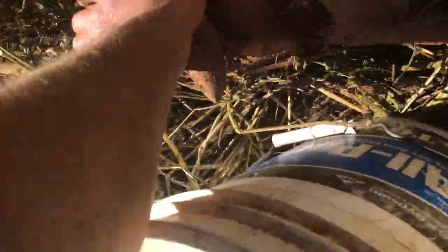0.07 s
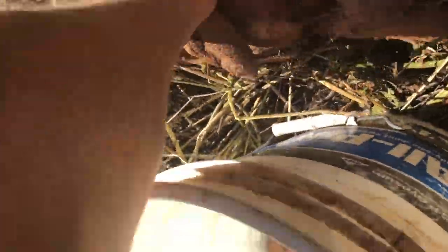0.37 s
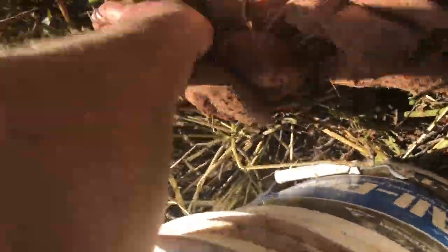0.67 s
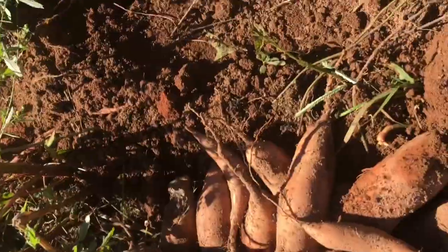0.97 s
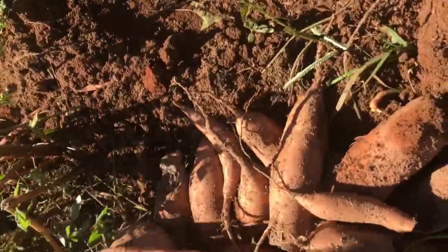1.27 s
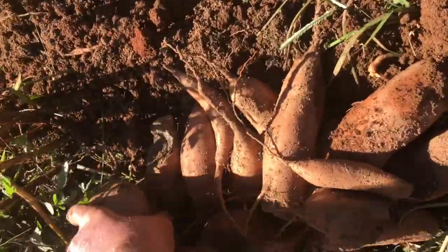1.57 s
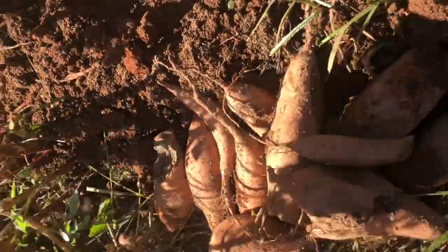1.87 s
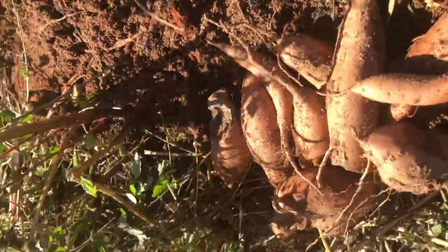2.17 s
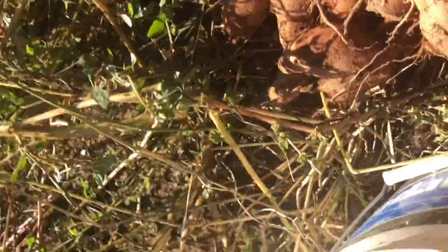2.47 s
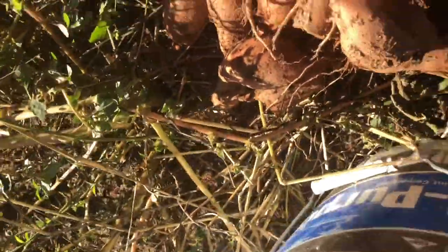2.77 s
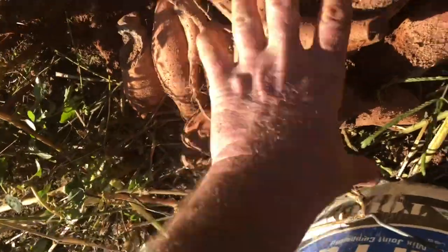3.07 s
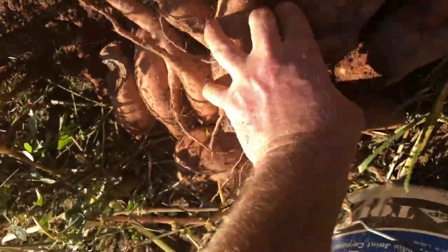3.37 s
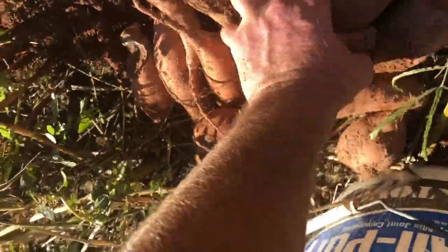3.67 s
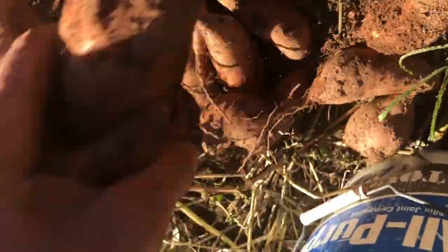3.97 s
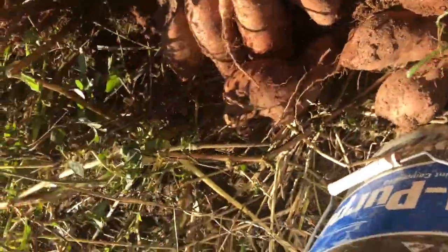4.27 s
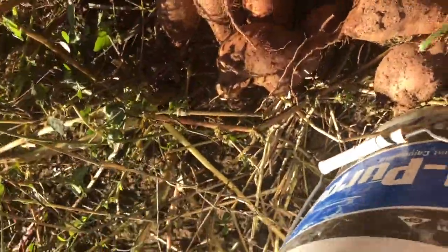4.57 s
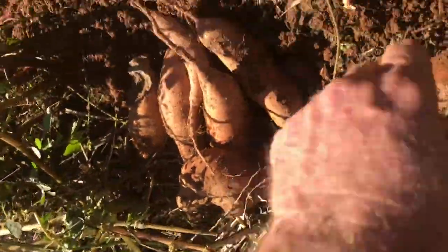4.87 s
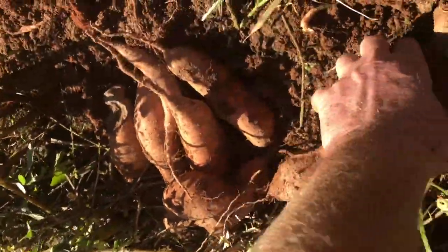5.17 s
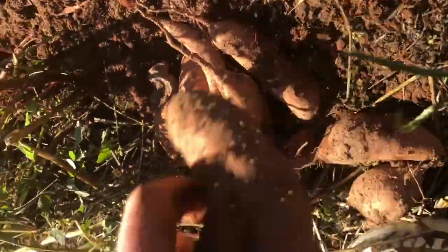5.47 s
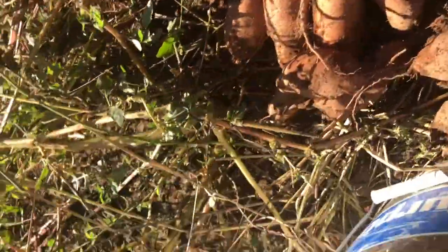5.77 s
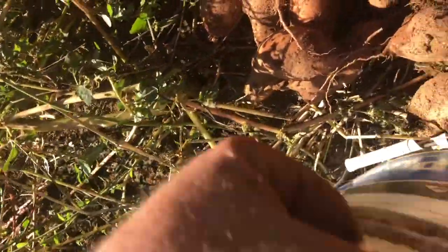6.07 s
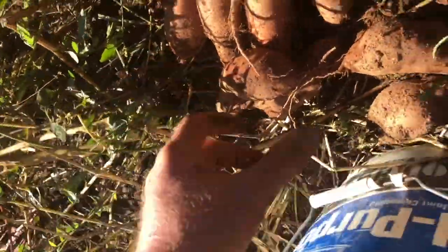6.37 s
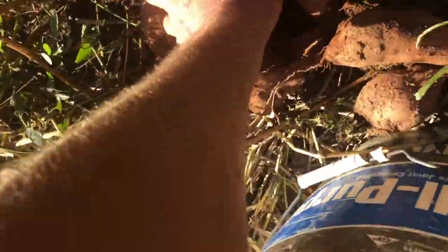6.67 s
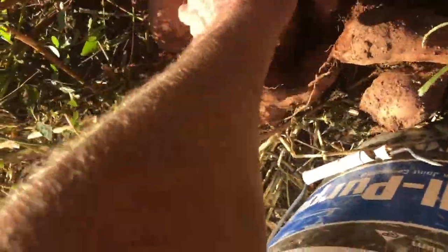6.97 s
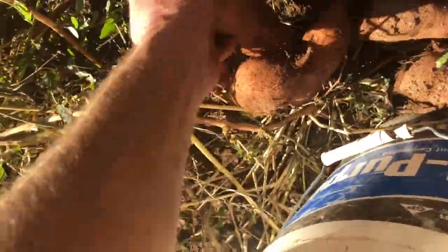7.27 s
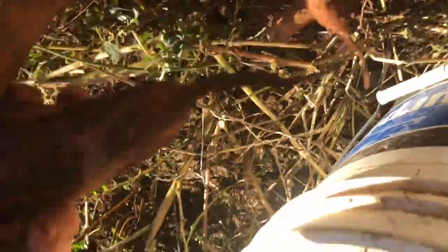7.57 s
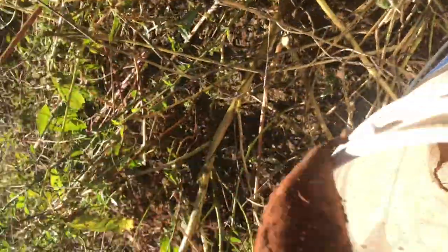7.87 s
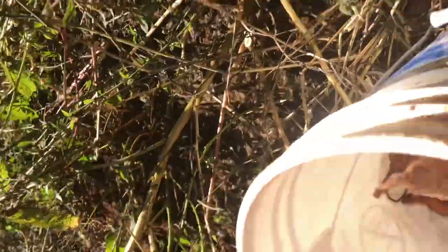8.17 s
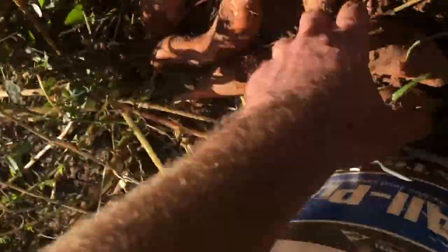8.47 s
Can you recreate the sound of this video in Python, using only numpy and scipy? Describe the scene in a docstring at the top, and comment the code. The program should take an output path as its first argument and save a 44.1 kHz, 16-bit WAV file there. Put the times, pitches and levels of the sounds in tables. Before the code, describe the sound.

Sweet potatoes drop into a plastic bucket in several separate bursts, each a hollow thump with bouncing, knocking and gritty scraping. Before and between the drops, fingers softly crumble earth and crackle dry grass. Past the middle, the plastic snaps sharply and its wire handle rings lightly; the heaviest thud comes near the end. The microphone is close, with only a faint open-air hiss and distant rumble behind.

```python
"""Sweet potatoes go into a plastic bucket in dry grass, close up, over a faint outdoor rumble and hiss.
First, hands work the crumbly soil while grit and stalks tick. Near 2.7 s a tuber booms on the bucket's
bottom, then tumbles and scrapes along the thin wall. A busier tumble follows at 4.3 s, flesh knocking
on flesh. At 6 s the plastic clicks sharply and the wire handle jingles. After more digging, the last
tubers land around 8 s. A limiter holds the loudest blows."""
import sys
import numpy as np
from scipy import signal
from scipy.fft import rfft, irfft, next_fast_len
from scipy.io import wavfile
from scipy.ndimage import uniform_filter1d, minimum_filter1d, map_coordinates

SR = 44100
rng = np.random.default_rng(int(sys.argv[2]) if len(sys.argv) > 2 else 0)


def persist_wave(psi):
    """Save psi, clipped to +-1, as 16-bit WAV."""
    counts = np.round(np.clip(psi, -1, 1) * 32767).astype(np.int16)
    wavfile.write(sys.argv[1], SR, np.atleast_2d(counts).T)


N = 380141

# soft blows on the loaded bottom: start_s, level_db, pitch_hz
BOTTOM_BLOWS = [(2.481, -24, 220), (2.62, -22.5, 147), (2.71, -2.5, 252), (2.732, -14, 215),
                (2.763, -21.5, 151), (2.826, -14, 210), (3.104, -9, 245), (4.303, -5, 243),
                (4.335, -16, 200), (4.47, -7, 263), (4.487, -5, 235), (4.517, -4.5, 261), (4.548, -2, 175),
                (4.589, -4.5, 247), (4.629, -9.5, 227), (5.955, -8.5, 256), (6.008, -13, 234),
                (6.381, -20, 240), (6.608, -5.5, 244), (6.654, -18, 222), (7.859, -6, 226),
                (7.869, -3.5, 218), (8.201, 1, 260), (8.213, -1.5, 211), (8.233, -4, 201), (8.28, -9, 240),
                (8.342, -9.5, 261), (8.478, -27.5, 230)]
# ring of the loaded bottom and the air above it: pitch_hz, level_db, t60_s
BOTTOM_MODES = [(140, -4.5, 0.086), (170, -4, 0.092), (212.6, -5.5, 0.17), (240, -4.5, 0.19),
                (288.4, -3.5, 0.062)]
# tubers tumbling on the wall: start_s, level_db, rise_s, hold_s, grit_offset_db, boom_offset_db
WALL_SKIDS = [(2.355, -34, 0.003, 0.012, -6, -17), (2.472, -31.5, 0.005, 0.035, -15, 0),
              (2.56, -39, 0.01, 0.1, -5, 3), (2.711, -32, 0.002, 0.02, -14, 0),
              (2.755, -27, 0.006, 0.014, -16, 2), (2.86, -35, 0.004, 0.012, -12, 3),
              (2.914, -32, 0.005, 0.025, -25, 3), (2.963, -29.5, 0.003, 0.012, -24, -5),
              (3.098, -36, 0.002, 0.008, -26, 6), (3.16, -43, 0.005, 0.03, -16, 4),
              (3.235, -41, 0.003, 0.005, -20, 8), (3.283, -41, 0.003, 0.005, -20, 2),
              (3.487, -32.5, 0.003, 0.026, -24, -17), (4.081, -40, 0.002, 0.003, -20, -9),
              (4.245, -35, 0.002, 0.03, -22, -8), (4.299, -21.5, 0.006, 0.012, -24, -1),
              (4.405, -21, 0.034, 0.03, -13, -5), (4.473, -16, 0.004, 0.05, -14, -2),
              (4.547, -15, 0.002, 0.02, -13, -2), (4.58, -19, 0.004, 0.05, -22, -4),
              (4.66, -29, 0.004, 0.02, -18, 0), (4.941, -40, 0.003, 0.015, -18, 4),
              (4.965, -32, 0.003, 0.025, -23, 3), (5.822, -45, 0.002, 0.003, -18, -12),
              (5.944, -13, 0.004, 0.028, -13.5, -7), (5.997, -15, 0.003, 0.024, -15, -7),
              (6.07, -25, 0.004, 0.014, -12, -2), (6.14, -36, 0.004, 0.014, -14, 1),
              (6.222, -39, 0.002, 0.006, -16, 5), (6.26, -35, 0.015, 0.012, -12, -6),
              (6.339, -28.5, 0.002, 0.006, -13, -8), (6.38, -43, 0.005, 0.08, -20, 2),
              (6.605, -26.5, 0.007, 0.012, -19, 6), (6.642, -22, 0.033, 0.016, -19, -6),
              (7.856, -15.5, 0.009, 0.06, -17, -10), (8.055, -41, 0.003, 0.006, -9, -10),
              (8.13, -34, 0.045, 0.02, -7, -12), (8.2, -18, 0.006, 0.04, -16, 1),
              (8.256, -14, 0.003, 0.015, -15, -6), (8.286, -16, 0.003, 0.045, -23, -7)]
# ring of the bucket's wall: pitch_hz, level_db, t60_s
WALL_MODES = [(519, -8, 0.071), (605, -20, 0.068), (717, -5.5, 0.11), (762.7, -4.5, 0.12),
              (911, -4.5, 0.073), (963, -3, 0.14), (1004, 0, 0.13), (1065, -2.5, 0.087),
              (1210, -2.5, 0.093), (1320, -10.5, 0.16), (1463, 0, 0.091), (1583, -1.5, 0.056),
              (1682, -0.5, 0.097), (1870, -2.5, 0.064), (1977, -10, 0.058), (2204, -2.5, 0.071),
              (2356, -2.5, 0.078), (2707, -9, 0.066), (3040, -18, 0.31), (3440, -25.5, .15),
              (3470, -25.5, 0.11), (4880, -19.5, 0.15)]
# tone of the flexing wall: frequency_hz, gain_db
FLEX_EQ = [(240, -30.5), (400, -24.5), (502, -16.5), (587, -10), (746, -7.5), (851, -13), (1010, -1),
           (1150, -8.5), (1460, -10), (2330, -11.5), (2560, -15.5), (7000, -35.5), (9100, -50),
           (15400, -120)]
# tone of grit scraping on plastic: frequency_hz, gain_db
GRIT_EQ = [(1500, -9), (3500, 0.5), (6000, -3.5), (9500, -6.5), (13000, -20), (16000, -11)]
# tuber on tuber, or squarely on the wall: start_s, peak_db, pitch_hz
TUBER_KNOCKS = [(1.588, -37.5, 787), (1.934, -31, 1060), (1.969, -36, 990), (2.357, -27.5, 1017),
                (2.913, -23, 560), (2.97, -24.5, 970), (3.098, -16.5, 627), (3.488, -27, 1030),
                (3.495, -22, 1013), (4.083, -32.5, 1305), (4.193, -33, 1470), (4.246, -17.5, 944),
                (4.299, -12.5, 950), (4.499, -6, 2000), (4.547, -7, 516), (4.625, -7.5, 1045),
                (4.967, -25, 682), (5.945, -11, 543), (6.002, -6, 1010), (6.225, -28, 953),
                (6.645, -19, 533), (7.858, -13, 1400), (8.201, -6, 514), (8.262, -4, 1030)]
# ring of the wire handle: pitch_hz, level_db, t60_s
HANDLE_MODES = [(7570, -9, .15), (7810, -12, .35), (9335, 0, .28), (9420, -7, .2), (10470, -10, .3),
                (10830, -11, .35), (11770, -10, .35)]
# plastic clicks near 2 kHz, brighter ticks of grit and stalks: start_s, peak_db, brightest_hz
CLICKS_AND_TICKS = [(0.5654, -34, 7410), (0.7292, -34, 6730), (1.3925, -24, 7890), (1.587, -16, 5900),
                    (1.775, -12, 5500), (1.806, -14, 7990), (1.854, -15, 8920), (1.8976, -21, 8100),
                    (2.4136, -21.5, 9360), (2.473, -25, 1930), (2.601, -19, 3830), (2.7641, -16, 1820),
                    (3.5108, -21, 1950), (3.5319, -16, 9940), (3.5494, -13, 9790), (3.98, -31, 7440),
                    (4.1918, -23, 9860), (4.2726, -24, 2370), (4.5496, -7, 2370), (4.5685, -5, 2080),
                    (4.951, -27, 9000), (5.115, -28, 6350), (5.209, -25, 4290), (5.7134, -27, 6640),
                    (6.0132, 3, 2460), (6.6729, -18, 2090), (7.7854, -19, 3800), (7.839, -24, 8500),
                    (8.259, -8, 1820)]
# a hand digging, gripping or spilling soil: start_s, length_s, crumble_db, rub_db
HAND_STROKES = [(0, 0.18, -54, -57), (0.3, 0.3, -60, -66), (0.97, 0.15, -55, -60), (0.72, 0.06, -53, -55),
                (1.33, 0.08, -51, -57), (1.48, 0.26, -53, -59), (1.73, 0.25, -42, -52),
                (1.775, 0.13, -42, -54), (2.0, 0.15, -54, -60), (2.5, 0.42, -51, -49),
                (3.3, 0.48, -55, -63), (3.53, 0.025, -38, -54), (4.245, 0.47, -44, -52),
                (4.7, 0.36, -57, -48), (4.945, 0.015, -44, -47), (5.105, 0.07, -45, -53),
                (5.205, 0.016, -40, -52), (5.92, 0.28, -47, -45), (6.25, 0.06, -43, -44),
                (6.46, 0.12, -58, -48), (6.78, 0.36, -57, -58), (6.88, 0.06, -45, -49),
                (7.16, 0.6, -48.5, -55), (7.62, 0.075, -43, -42), (7.83, 0.19, -46, -57),
                (8.04, 0.1, -52, -53), (8.17, 0.23, -44, -50), (8.42, 0.2, -53, -51)]
# tone of crumbling soil: frequency_hz, gain_db
SOIL_EQ = [(880, -45), (1500, -4), (2740, -6), (4040, -0.5), (7920, 0.5), (10500, 2), (14800, -1),
           (16000, -21)]
# tone of tubers rubbing together: frequency_hz, gain_db
RUB_EQ = [(120, -11.5), (230, 3.5), (420, 0.5), (700, -0.5), (1050, 1), (1600, 1.5), (2400, -5.5),
          (4000, -9), (8000, -29)]
# level ride of the open air: time_s, rumble_db, hiss_db
AIR_LEVELS = [(0, -53, -50.5), (1.5, -53.5, -49.8), (2.3, -56.5, -50.5), (3.5, -56, -48.2),
              (4.1, -61, -50.3), (5.6, -56, -49), (6.4, -53, -49.5), (7.3, -61, -47.5), (8.6, -53, -48.5)]
# tone of the distant rumble: frequency_hz, gain_db
RUMBLE_EQ = [(25, -26), (55, -4.5), (100, -1), (160, 1), (200, -12), (340, -19), (540, -24), (740, -27),
             (1000, -25), (1500, -45.5), (2600, -100)]
# tone of the hiss: frequency_hz, gain_db
HISS_EQ = [(400, -6.5), (1000, -2), (1650, -6), (2800, -5.5), (4250, -9), (4500, 2), (4800, -11),
           (5950, -2), (6700, 6), (7500, 8), (8200, -3.5), (11000, -6.5), (14000, 8), (16000, 5)]

THUD_RISE_S, RISE_S_PER_DB = 0.006, 0.00015  # attack at 0 dB; gentler blows swell more slowly
SETTLE_T60_S, SETTLE_S_PER_DB = 0.3, 0.0048  # tail of a skid at 0 dB; gentler ones rest sooner
BUMPS_PER_S, BUMP_DB = 70, 1.3  # a lumpy tuber presses unevenly as it rolls
ROLL_DB, BOUNCE_DB, BOUNCE_T60_S = -2.2, -5, 0.07  # rolling pressure, and the shove of a bounce
JINGLE_START_S, JINGLE_DB = 6.016, -33
GRIP_S, LET_GO_T60_S = 0.014, 0.26  # attack and release of a hand's stroke
STIR_CRUMBLE_DB, STIR_RUB_DB = -64, -69  # soil and grass stir faintly between strokes


def bottom_thuds():
    """The bottom swings for a few cycles, pushes on the ground and leaves the bucket humming."""
    out, t = np.zeros(N), np.arange(SR // 2) / SR
    modes = ringing(BOTTOM_MODES, t)
    for start_s, level_db, pitch_hz in BOTTOM_BLOWS:
        rise_s = max(THUD_RISE_S - RISE_S_PER_DB * level_db, 0.002)
        progress = t / rise_s
        swell = (progress * np.exp(1 - progress)) ** 2
        boom = swell * np.sin(2 * np.pi * pitch_hz * t)
        ground = amp(-23) * swell * np.sin(2 * np.pi * 118 * t)
        ring = unit_peak(rng.uniform(0.38, 1, len(modes)) @ modes)
        hum = amp(-9) * (1 - np.exp(-progress)) * ring
        add(out, start_s, amp(level_db) * (boom + ground + hum))
    return out


def wall_skids():
    """Rough skin chatters along the plastic; each skid rings wall and bottom at new strengths."""
    out, t = np.zeros(N), np.arange(SR // 2) / SR
    wall_modes, bottom_modes = ringing(WALL_MODES, t), ringing(BOTTOM_MODES, t)
    pressure = wall_pressure()
    for start_s, level_db, rise_s, hold_s, grit_db, boom_db in WALL_SKIDS:
        contact = envelope(t, rise_s, hold_s, SETTLE_T60_S + SETTLE_S_PER_DB * level_db)
        contact *= np.roll(pressure, -round(start_s * SR))[:len(t)]
        chatter = contact * grains(len(t), per_s=6000, spread_db=0.15)
        scratch = contact * grains(len(t), per_s=2100, spread_db=1.0)
        flex = amp(-3.3) * unit_rms(equalise(chatter, FLEX_EQ))
        ring = amp(-5.7) * resonate(chatter, wall_modes)
        boom = amp(boom_db) * resonate(chatter, bottom_modes)
        grit = amp(grit_db) * unit_rms(equalise(scratch, GRIT_EQ))
        contact_rms = np.sqrt(np.mean(contact ** 2))
        add(out, start_s, amp(level_db) * contact_rms * (flex + ring + boom + grit))
    return out


def wall_pressure():
    """How hard the tubers lean on the wall: a lumpy roll, and a shove at every bounce."""
    shoves, t = np.zeros(N), np.arange(SR // 4) / SR
    for start_s, _, _ in BOTTOM_BLOWS:
        add(shoves, start_s, decay(t, BOUNCE_T60_S))
    lumps = amp(BUMP_DB * wobble(BUMPS_PER_S))
    return lumps * (amp(ROLL_DB) + amp(BOUNCE_DB) * np.minimum(shoves, 1))


def tuber_knocks():
    """Firm flesh gives a short woody note with one overtone."""
    out, t = np.zeros(N), np.arange(SR // 8) / SR
    attack = 1 - np.exp(-t / 0.00052)
    for start_s, peak_db, pitch_hz in TUBER_KNOCKS:
        body = np.sin(2 * np.pi * pitch_hz * t)
        overtone = amp(-5.5) * decay(t, t60_s=0.06) * np.sin(2 * np.pi * 1.43 * pitch_hz * t)
        knock = (body + overtone) * attack * decay(t, t60_s=0.032)
        add(out, start_s, amp(peak_db) * unit_peak(knock))
    return out


def clicks_and_ticks():
    """The plastic bucket clicks sharply, grit and stalks tick brighter: a crack with a short tail."""
    out, t = np.zeros(N), np.arange(SR // 20) / SR
    crack, tail = decay(t, t60_s=0.008), amp(-18) * decay(t, t60_s=0.04)
    for start_s, peak_db, brightest_hz in CLICKS_AND_TICKS:
        burst = rng.standard_normal(len(t)) * (crack + tail)
        mid_db = -4 * np.log2(brightest_hz / 400)
        top_db = -5 * np.log2(16000 / brightest_hz)
        click_eq = [(200, -24), (1000, mid_db), (brightest_hz, 0), (16000, top_db)]
        add(out, start_s, amp(peak_db) * unit_peak(equalise(burst, click_eq)))
    return out


def digging_hands():
    """Soil crumbles in clumps and single stalks crackle while tubers rub on each other."""
    t = np.arange(N) / SR
    crumble_gain, rub_gain = amp(STIR_CRUMBLE_DB), amp(STIR_RUB_DB)
    for start_s, length_s, crumble_db, rub_db in HAND_STROKES:
        effort = envelope(t - start_s, GRIP_S, length_s - GRIP_S, LET_GO_T60_S)
        crumble_gain = np.hypot(crumble_gain, amp(crumble_db) * effort)
        rub_gain = np.hypot(rub_gain, amp(rub_db) * effort)
    pressure = unit_rms(amp(2 * wobble(per_s=50)))
    dust = grains(N, per_s=3200, spread_db=0.5)
    stalks = grains(N, per_s=150, spread_db=2.5)
    friction = grains(N, per_s=3000, spread_db=0.8)
    crumble = unit_rms(equalise(dust + amp(-5) * stalks, SOIL_EQ))
    rub = unit_rms(equalise(friction, RUB_EQ))
    return pressure * (crumble_gain * crumble + rub_gain * rub)


def handle_jingle():
    """One blow sets the wire handle ringing in its sockets."""
    out, t = np.zeros(N), np.arange(SR // 2) / SR
    add(out, JINGLE_START_S, amp(JINGLE_DB) * ringing(HANDLE_MODES, t).sum(axis=0))
    return out


def open_air():
    """A bed of distant rumble and fine hiss, each drifting slowly in level."""
    t = np.arange(N) / SR
    time_s, rumble_db, hiss_db = np.transpose(AIR_LEVELS)
    rumble = unit_rms(equalise(rng.standard_normal(N), RUMBLE_EQ))
    hiss = unit_rms(equalise(rng.standard_normal(N), HISS_EQ))
    return amp(np.interp(t, time_s, rumble_db)) * rumble + amp(np.interp(t, time_s, hiss_db)) * hiss


def amp(db):
    return 10 ** (np.asarray(db) / 20)


def unit_rms(x):
    return x / np.sqrt(np.mean(x ** 2) + 1e-20)


def unit_peak(x):
    return x / np.max(np.abs(x))


def decay(t, t60_s):
    return np.exp(-np.log(1000) * t / max(t60_s, 1e-3))


def envelope(t, rise_s, hold_s, t60_s):
    """Attack, hold and release."""
    attack = np.clip(t / max(rise_s, 1e-3), 0, 1)
    return attack * decay(np.maximum(t - rise_s - hold_s, 0), t60_s)


def add(track, start_s, sound):
    """Mix a sound into the track at its cue."""
    part = track[round(start_s * SR):][:len(sound)]
    part += sound[:len(part)]


def equalise(x, eq):
    """Shape the tone with a minimum-phase filter, so nothing rings ahead of an attack."""
    size = 2 * next_fast_len(len(x) // 2 + 2048)
    frequency_hz, gain_db = np.transpose(eq)
    bin_hz = np.fft.rfftfreq(size, 1 / SR)
    curve_db = np.interp(np.log(bin_hz + 1), np.log(frequency_hz), gain_db)
    cepstrum = irfft(np.log(amp(curve_db)))
    cepstrum[1:size // 2] *= 2
    cepstrum[size // 2 + 1:] = 0
    return irfft(rfft(x, size) * np.exp(rfft(cepstrum)))[:len(x)]


def grains(size, per_s, spread_db):
    """Tiny random impacts of unequal strength, at unit rms."""
    strength = amp(spread_db * np.minimum(rng.exponential(size=size), 4))
    hits = rng.random(size) < per_s / SR
    return unit_rms(hits * strength * rng.standard_normal(size))


def ringing(modes, t):
    """One damped sine per mode, each in its own row."""
    return np.array([amp(db) * decay(t, t60_s) * np.sin(2 * np.pi * hz * t) for hz, db, t60_s in modes])


def resonate(drive, modes):
    """Play the drive through ringing modes of random polarity, at unit rms."""
    response = rng.choice([-1, 1], len(modes)) @ modes
    return unit_rms(signal.fftconvolve(drive, response)[:len(drive)])


def wobble(per_s):
    """A smooth curve through per_s random points a second."""
    return map_coordinates(rng.standard_normal(2048), [np.arange(N) * per_s / SR], mode="wrap")


def scene():
    """Bucket, hands and open air, mixed in mono at one close microphone."""
    bucket = bottom_thuds() + wall_skids() + tuber_knocks() + handle_jingle()
    return (bucket + clicks_and_ticks() + digging_hands() + open_air())[None]


def record(dry):
    """The microphone sheds the deepest bass, a fast limiter holds the peaks and the very top is cut."""
    low_cut_hz, high_cut_hz, ceiling, window_samples = 42, 16050, 0.9, 177
    mic = signal.sosfilt(signal.butter(3, low_cut_hz, "high", fs=SR, output="sos"), dry)
    safe_gain = np.minimum(1, ceiling / (np.abs(mic) + 1e-9))
    gain = uniform_filter1d(minimum_filter1d(safe_gain, window_samples), window_samples)
    passband = np.fft.rfftfreq(N, 1 / SR) < high_cut_hz
    return irfft(rfft(mic * gain) * passband, N)


dry = scene()
out = record(dry)
persist_wave(out)
```